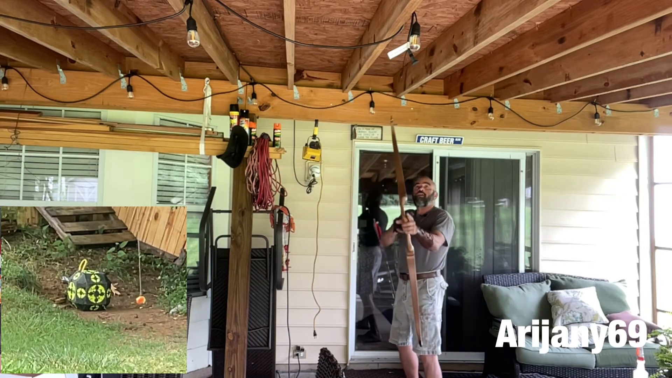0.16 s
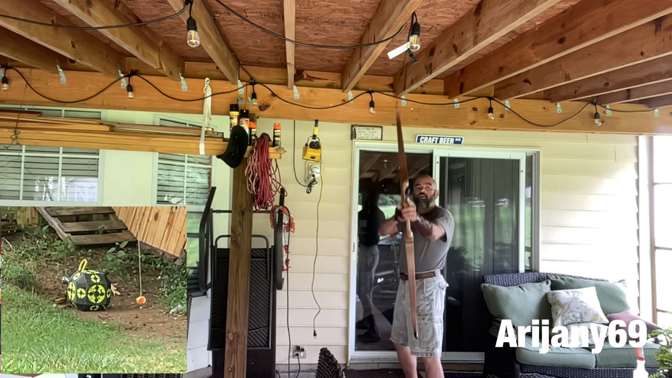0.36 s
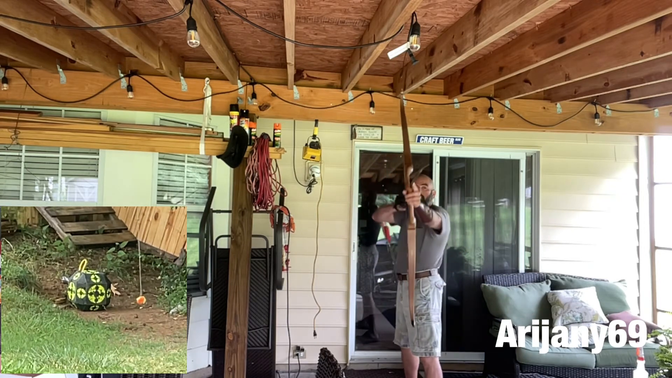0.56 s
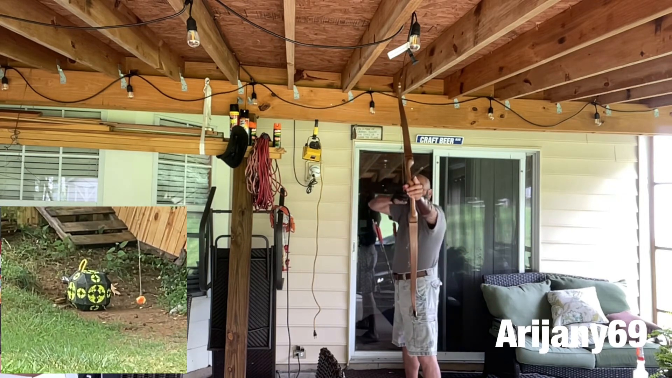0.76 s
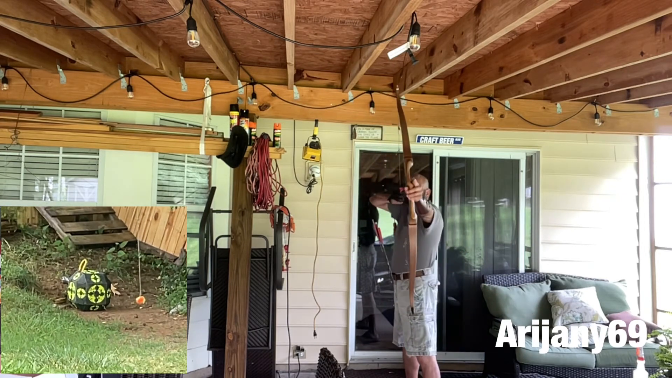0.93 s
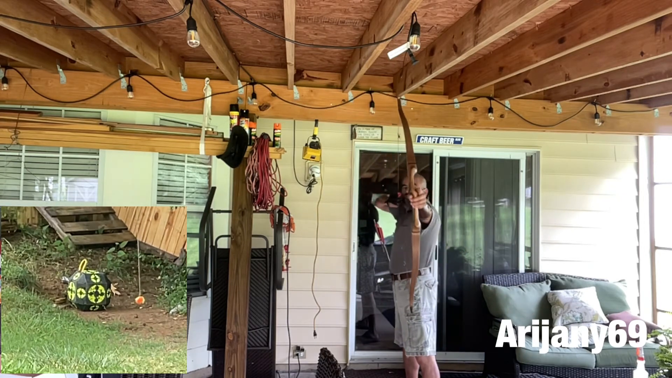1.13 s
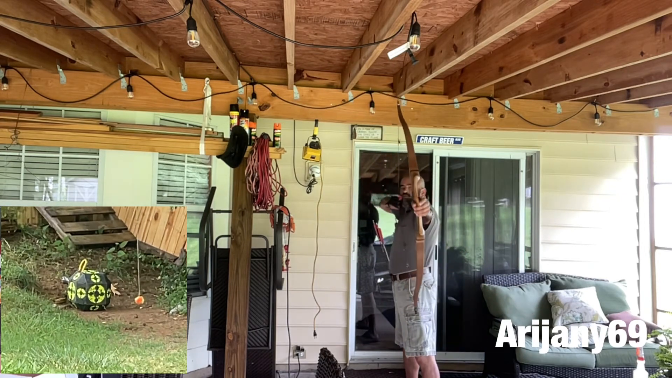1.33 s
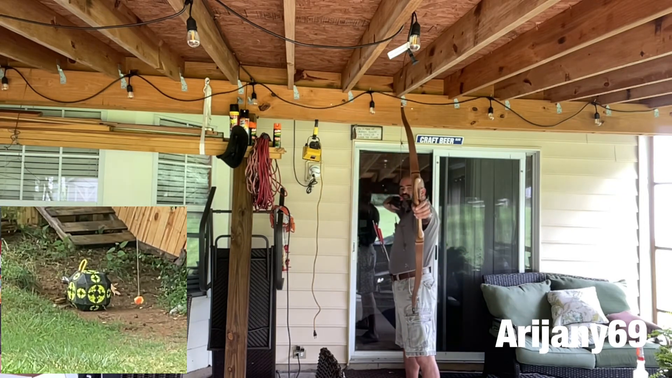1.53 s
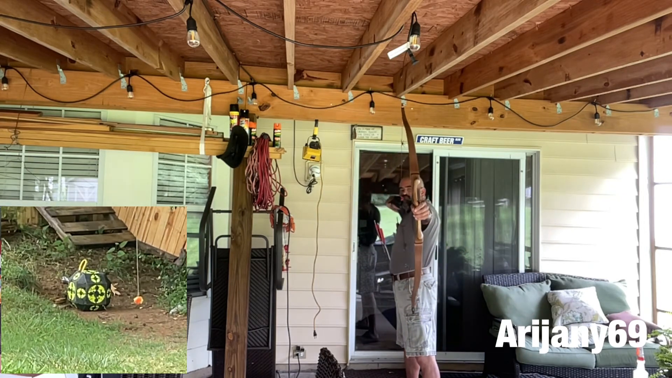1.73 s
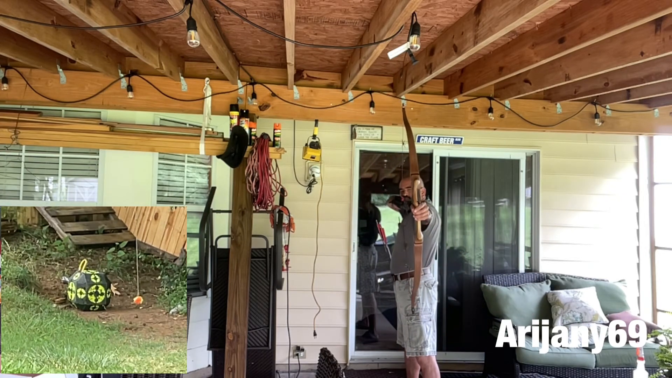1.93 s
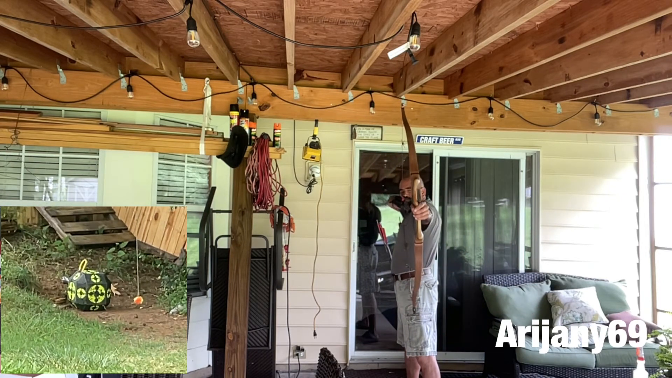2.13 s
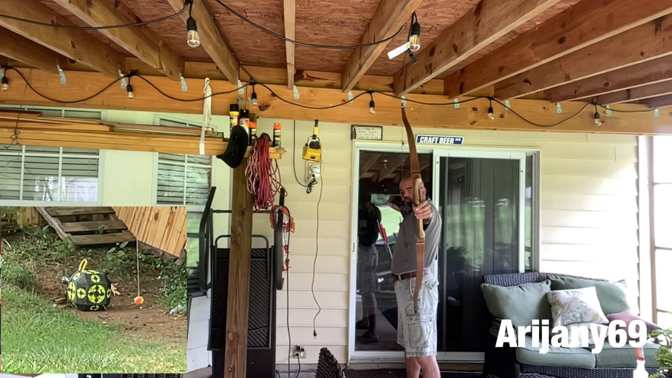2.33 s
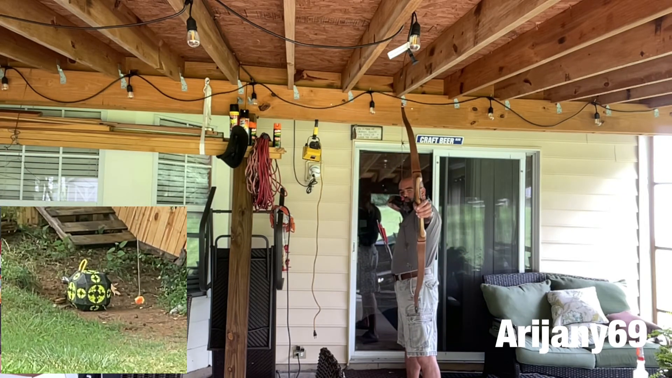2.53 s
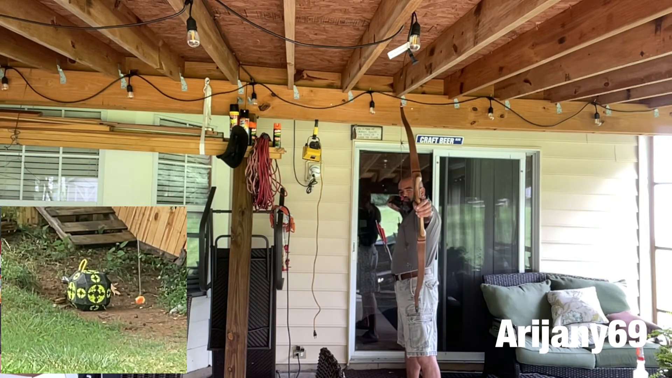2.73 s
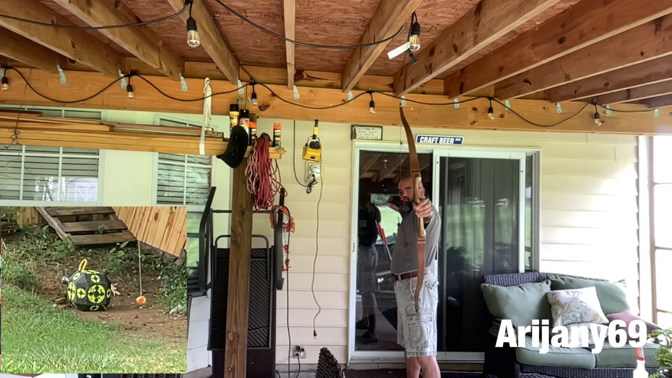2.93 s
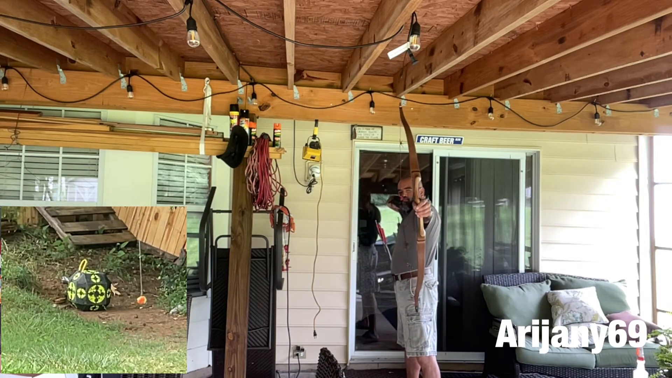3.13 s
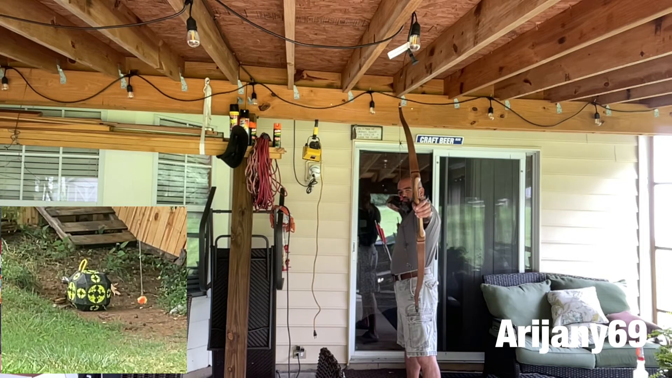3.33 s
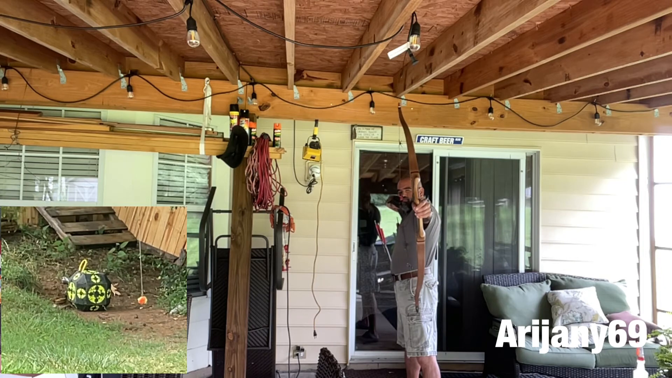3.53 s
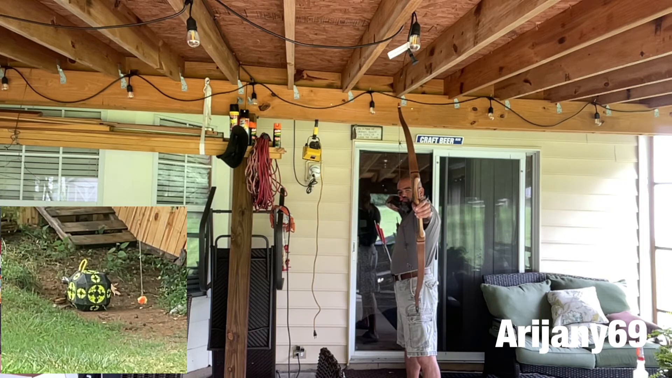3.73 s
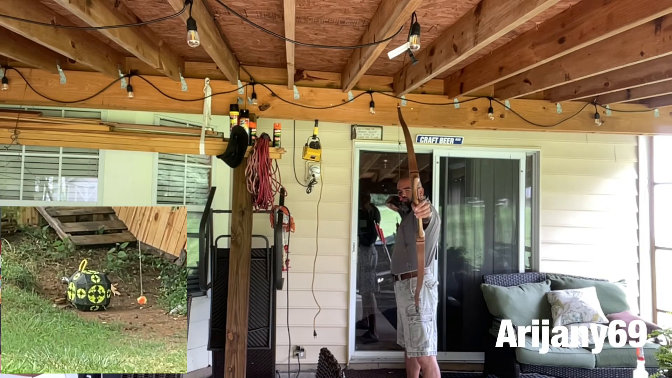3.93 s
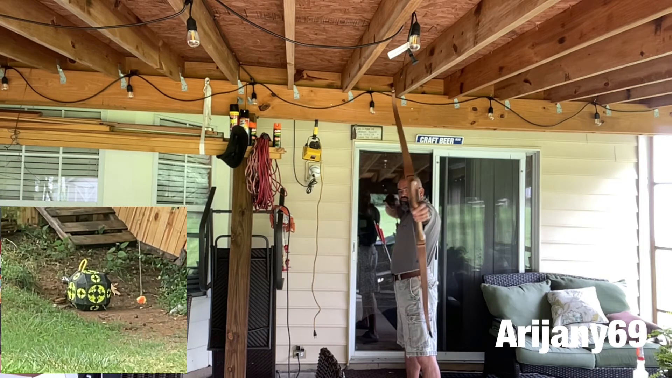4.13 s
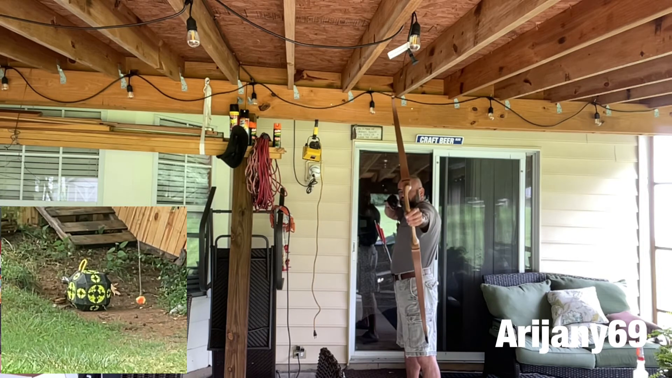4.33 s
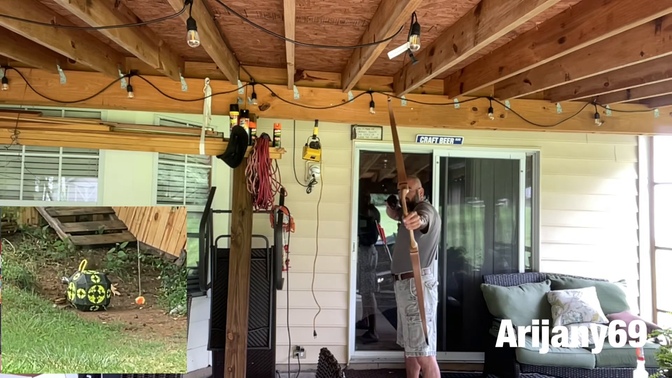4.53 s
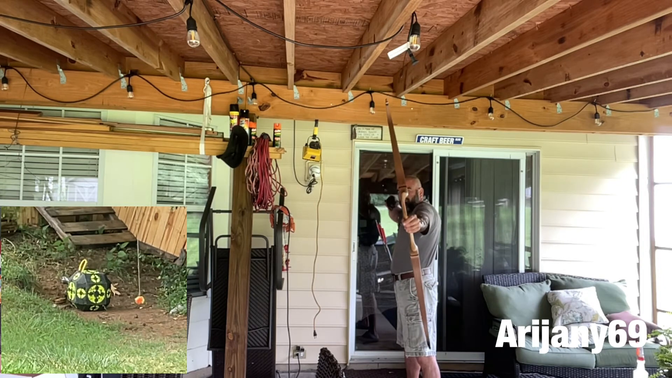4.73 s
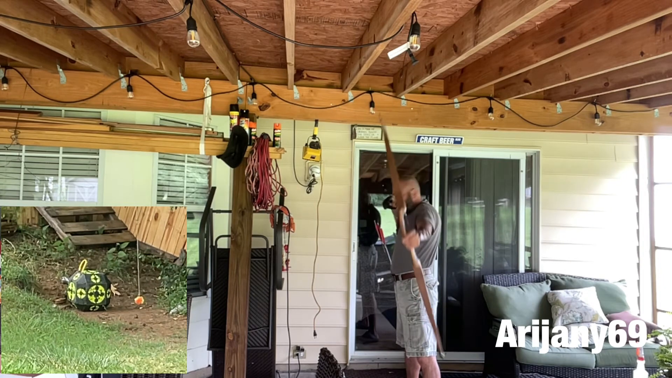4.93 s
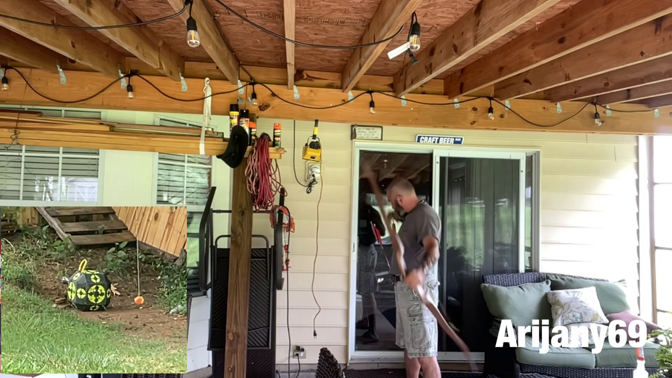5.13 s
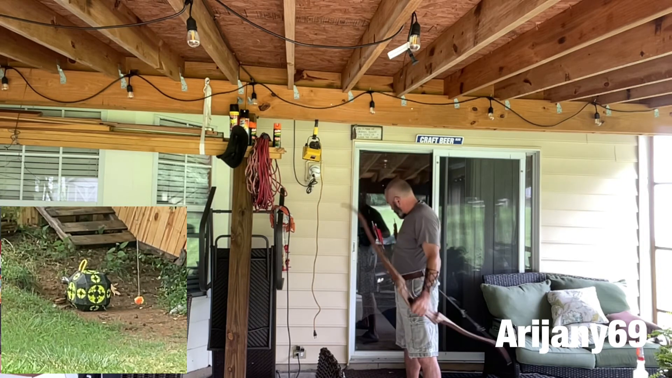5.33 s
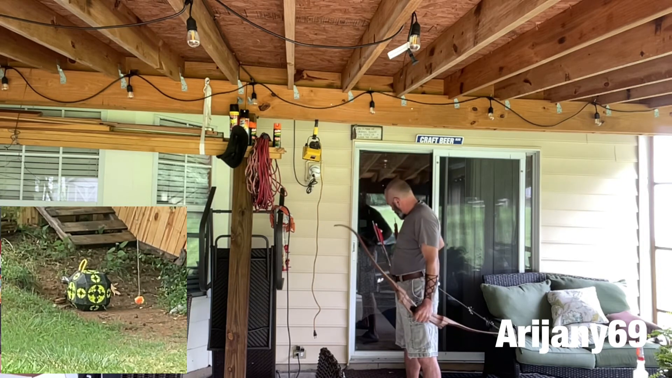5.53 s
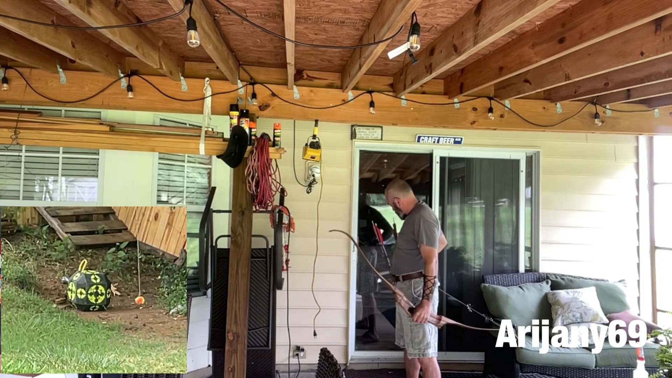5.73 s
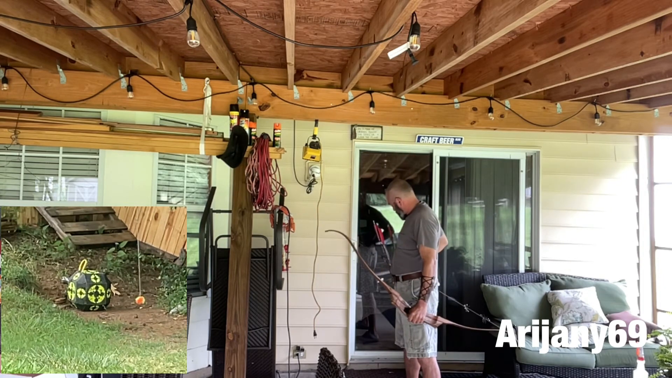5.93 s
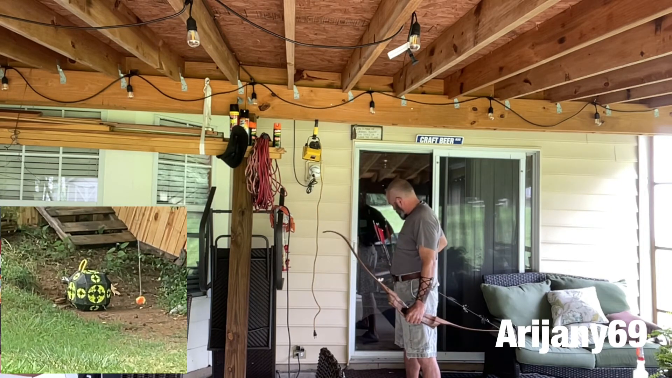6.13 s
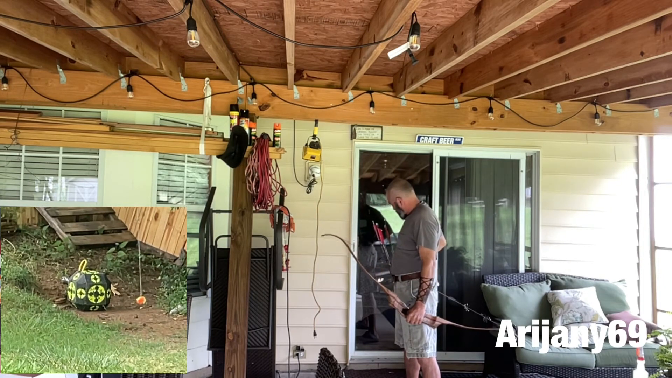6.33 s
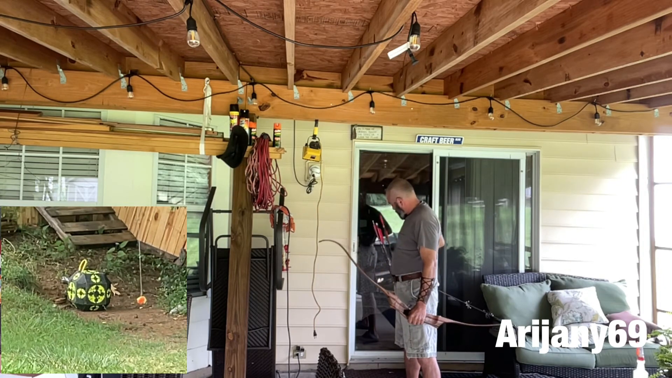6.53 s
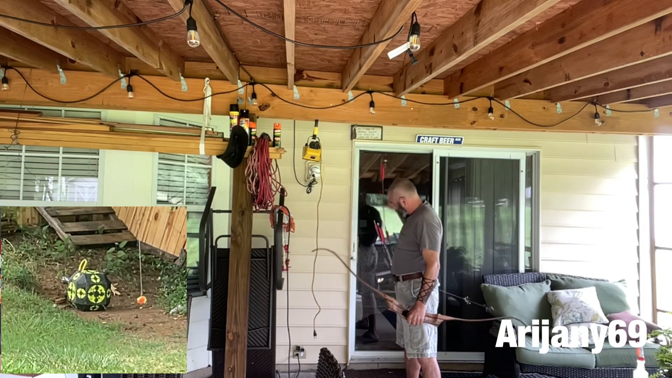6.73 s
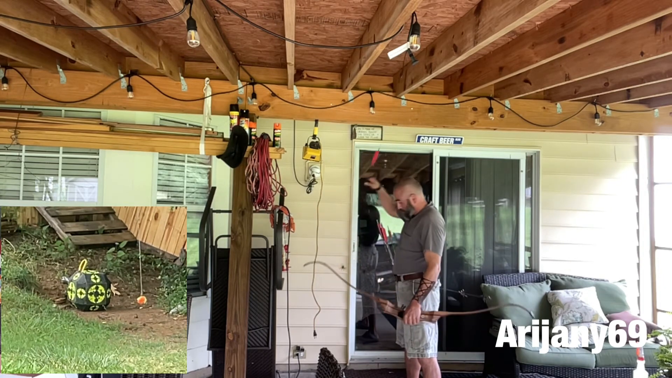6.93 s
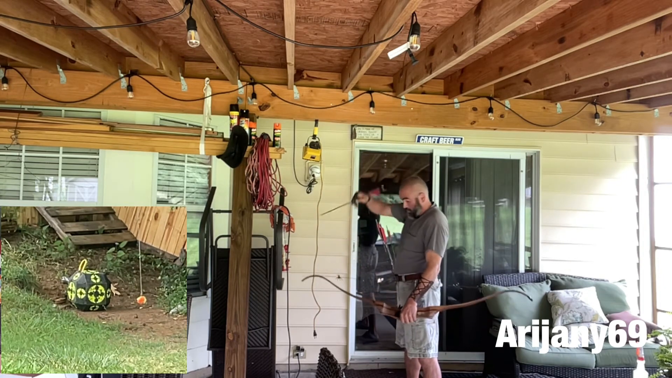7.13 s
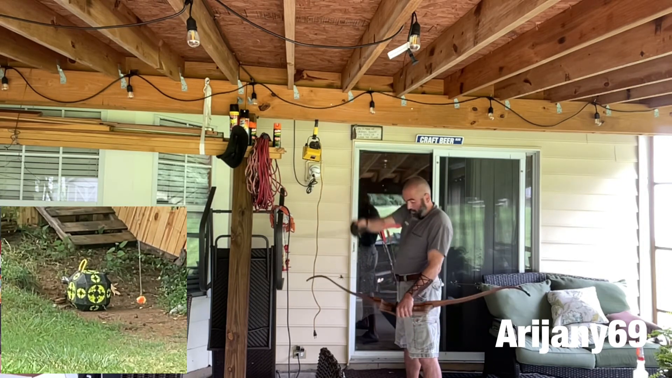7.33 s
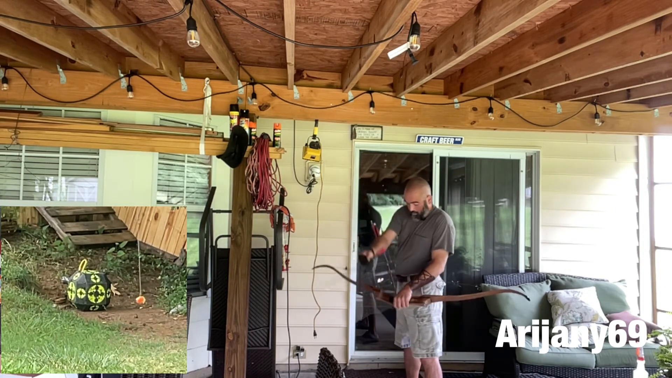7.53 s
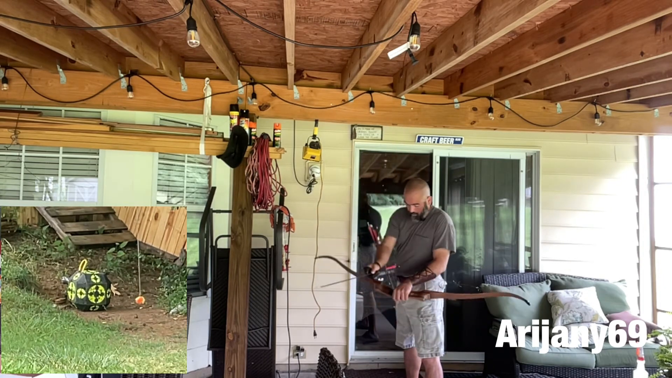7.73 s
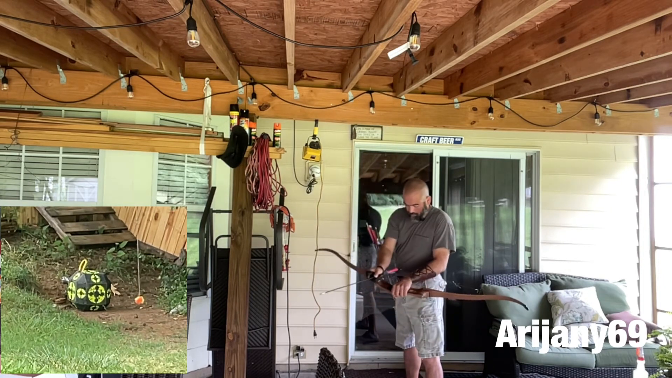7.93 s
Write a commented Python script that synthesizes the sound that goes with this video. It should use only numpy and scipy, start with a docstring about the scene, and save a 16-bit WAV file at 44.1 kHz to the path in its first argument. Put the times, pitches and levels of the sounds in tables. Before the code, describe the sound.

A quiet backyard heard from beneath a wooden porch, in mono. Distant traffic rumbles and gently swells throughout, with soft air, leaf hiss and a thin, shrill pulsing insect chorus. From 0.1 to 2.2 seconds a bird gives eight quick arched whistles, most trailed by a tiny higher flick, while an arrow rubs and ticks faintly until about 0.7. Hazier slurred calls begin near 2.9. At 4.0 the bow is shot, by far the loudest event: a gritty release, scrape and hard woody slap within a few hundredths of a second, then a low hum dying quickly with short porch reflections. A very faint landing follows at 4.5 among repeating birds. Soft knocks come around 5.1, rubbing from 5.5 to 6.4, and a clearer tick at 6.5. Lower bird notes repeat from 7.0, and a hollow, low rush rises to about 7.85, easing by the end at 8.

```python
"""Far traffic, leaf hiss and shrill insects last throughout, made from shaped noise and buzzing tones.
First a bird's arched whistles (gliding pure tones) sound over the rubs and ticks of a bow being drawn; then
more bird calls join in. At about 4 s the bow is shot under a wooden porch roof: gritty noise for the sliding
string and arrow, ringing tones for the shaft, limbs and string, then a faint landing. Afterwards the gear rubs,
knocks and ticks amid more bird calls, and a hollow rush of noise rises briefly near the end."""
import sys
import numpy as np
from scipy import signal
from scipy.fft import rfft, irfft, next_fast_len
from scipy.io import wavfile
from scipy.ndimage import map_coordinates

SR = 44100
rng = np.random.default_rng(int(sys.argv[2]) if len(sys.argv) > 2 else 0)


def materialize(psi):
    """Save the field psi as 16-bit PCM at rate SR to the path in sys.argv[1].

    A 1-D psi becomes a single channel; in a 2-D psi each row is a channel.
    """
    bounded = np.clip(np.atleast_2d(psi).T, -1, 1)
    quanta = np.round(bounded * 32767).astype(np.int16)
    wavfile.write(sys.argv[1], SR, quanta)


N = 355710  # length in samples, about 8 s

# Noise colours, from deep to high, as relative levels: pitch_hz, level_db
# deep rumble of far traffic
RUMBLE_COLOUR = [(15, -54), (25, -56), (48, -6), (102, 1), (122, -1.5), (194, -16), (220, -18.5),
                 (290, -37), (480, -120)]
# the traffic's roar
ROAR_COLOUR = [(120, -10), (200, -4.5), (240, -3.5), (295, 1.5), (340, -5.5), (390, -9.5), (480, -13),
               (650, -51), (1200, -77)]
# soft wash of the open air
WASH_COLOUR = [(250, 0), (480, 1), (650, 2), (900, -2), (1300, -1), (1550, -6.5), (1800, -4.5), (2100, -10),
               (2500, -16.5), (3500, -30), (6000, -62)]
# hiss of leaves
LEAF_COLOUR = [(1000, -6), (2800, 4.5), (4000, 1.5), (4800, 1), (6200, 2), (8000, -5.5), (11800, -8.5),
               (15000, -1)]
# hollow rush
RUSH_COLOUR = [(110, -23), (160, 3.5), (210, 0.5), (330, 0), (390, -2.5), (460, -5.5), (540, -22),
               (700, -13.5), (800, -21.5), (980, -11), (1100, -26), (1400, -62)]
# insect chorus
CHORUS_COLOUR = [(7500, -60), (8900, -23), (9300, -12), (9600, -3), (10200, 0), (10550, -8), (10900, -13.5),
                 (11700, -33)]
# arrow, bow and clothing rubbing
RUB_COLOUR = [(400, -19), (1200, 5), (2500, 0.5), (4000, 1), (7500, 0), (11000, -6), (15000, -2.5)]
# string sliding off the fingers
LOOSE_COLOUR = [(200, -27), (480, -2.5), (1500, 2), (2500, -11), (5000, -10), (8000, -16), (12000, -19),
                (15000, -21)]
# arrow and string against the riser, the bow's handle part
SCRAPE_COLOUR = [(230, -25), (400, -0.5), (650, -2.5), (1000, -15), (1500, -6), (1850, 0.5), (2200, -8),
                 (3000, -6), (4300, -10.5), (5200, -7.5), (7000, -11), (10000, -15), (12000, -17),
                 (15000, -11.5)]
# the arrow landing
LANDING_COLOUR = [(200, -10), (600, 8), (1500, -19), (3200, 5), (7000, -5), (12000, -9), (15500, -14)]

# Loudness of the leaf hiss over time: time_s, level_db
LEAF_LEVELS = [(0, -67.5), (2.8, -72), (4.5, -66.5), (6.6, -69.5), (7.2, -65.5), (8.07, -69)]
# Loudness of the hollow rush over time: time_s, level_db
RUSH_LEVELS = [(7, -73), (7.5, -52.5), (7.68, -48), (7.85, -42.5), (8, -50), (8.07, -52)]
# Swells of the traffic: middle_s, half_width_s, rumble_rise_db, roar_rise_db
TRAFFIC_SWELLS = [(.2, 0.65, 1, 0.5), (2.15, 0.32, 3, 0.5), (3.2, 0.71, 3, 3), (4.45, 0.55, 1.5, 6.5),
                  (5.35, .07, 4.5, -1), (6.3, 0.34, 0, 3), (7.75, 0.48, 1, 3)]
RUMBLE_DB, ROAR_DB, WASH_DB = -45, -53.5, -59.7  # steady levels; the swells shift the first two

# Insects of the chorus: pulses_per_s, pitch_hz, upward_sweep_hz, level_db
BUZZERS = [(5.6, 10230, 427, -68.5), (6.6, 9720, 447, -72), (9.4, 10350, 726, -71), (10, 9600, 930, -75)]
# Bouts of even chirping: first_middle_s, period_s, chirp_count
CHIRP_BOUTS = [(.11, 0.19, 13), (2.99, 0.24, 2), (3.56, .205, 3), (4.35, .223, 6), (5.66, 0.196, 7),
               (7.06, 0.21, 5)]
CHIRP_S, CHIRP_DB = 0.12, -70

# Bird syllables, named for their shape: share_of_length, pitch_hz, level_db (pitch and level are relative)
ARCH = [(0, 2770, -14), (.15, 3050, -5), (.3, 3320, -12.5), (.48, 3270, -7), (.66, 2883, -2.5),
        (.85, 2765, -2), (1, 2770, -4)]
FLICK = [(0, 4350, -2), (.35, 3630, -5.5), (.55, 4400, -5.5), (1, 4020, -12)]
SLUR = [(0, 2883, -7), (.18, 3250, -12), (.4, 2900, -7), (.68, 3250, -3), (.86, 2950, 2), (1, 2590, 4.5)]
SAG = [(0, 5130, 6), (.2, 4880, -2), (.45, 4720, -8), (1, 4650, -4)]
FALL = [(0, 4220, -3), (.3, 3620, -5), (1, 2950, -5)]
DIP = [(0, 8700, -2), (.15, 7400, 2), (.5, 6800, -15), (.8, 6850, -6), (1, 7800, -12)]
DROP = [(0, 2156, -7), (.25, 2282, -9), (.42, 2170, -0.5), (.6, 2030, -3), (.68, 2100, -14), (.8, 2020, -6),
        (1, 1880, -8)]
# The near bird's arched whistles: start_s, level_db
WHISTLES = [(0.083, -55), (.332, -49), (.595, -51), (.882, -53.3), (1.174, -49.5), (1.467, -49.5),
            (1.801, -52.5), (2.11, -53)]
WHISTLE_S, WHISTLE_PITCH_RATIO, WHISTLE_SCATTER = 0.096, 0.98, 0.44
# A softer, higher flick trails each whistle that starts later than FLICK_FROM_S
FLICK_FROM_S, FLICK_AFTER_S, FLICK_S = 0.5, 0.138, 0.042
FLICK_DB, FLICK_SCATTER = -11.5, 0.72  # level compared with its whistle; share scattered
# Far birds repeat one syllable evenly while level and pitch drift: first_s, period_s, syllable_count,
# first_level_db, last_level_db, first_pitch_ratio, last_pitch_ratio, scattered_share, length_s, syllable
PHRASES = [(2.87, 0.2, 4, -62, -57.5, 1.05, 0.98, 0.81, 0.096, SLUR),
           (3.721, .218, 9, -60, -69, .99, 1, 0.85, .085, SLUR),
           (5.711, .198, 4, -62.5, -59.5, .93, .91, 0.7, .095, SLUR),
           (7.035, 0.21, 5, -64, -60, 1, 0.99, .5, 0.15, DROP)]
# Single bird calls, some of them the slurred syllable of the phrases above:
# start_s, length_s, level_db, pitch_ratio, scattered_share, syllable
SINGLE_CALLS = [(3.254, .07, -60, 0.97, .2, DIP), (5.047, .44, -67, 0.97, 0.94, SAG),
                (5.13, .27, -70, .77, 0.9, SAG), (5.252, .1, -62, 0.95, 0.7, SLUR),
                (6.697, .095, -62.5, .86, 0.6, SLUR), (7.041, 0.25, -61.5, 0.99, .97, FALL)]
# House walls across the yard, which return the calls: delay_s, level_db
WALLS = [(.027, -10), (.052, -18)]

# Arrow, bow and clothing rubbing: start_s, level_db, rise_s
RUBS = [(.015, -50, 0.0094), (.29, -55, .06), (.39, -54.5, 0.034), (5.53, -60, .015), (5.621, -62.5, 0.039),
        (5.71, -57.5, 0.017), (5.83, -61.5, .015), (6.372, -62, 0.024)]
RUB_T60_S, RUB_TILT_DB = 0.23, -0.9  # time to fall by 60 dB; tilt per octave
# Small ticks of the arrows: start_s, level_db
TICKS = [(.552, -53.5), (.635, -59), (6.246, -62), (6.539, -45.5), (6.578, -56), (7.53, -60)]
TICK_RISE_S, TICK_T60_S, TICK_TILT_DB = 0.012, 0.067, 2.5
# Light knocks as the bow is lowered: start_s, level_db, pitch_hz
KNOCKS = [(5.085, -55, 1076), (5.185, -56.5, 1580), (5.63, -64, 2110)]

# The arrow shaft and nock as the fingers let go: pitch_hz, level_db, t60_s
SHAFT_TONES = [(470, -15, 0.12), (625, -2, 0.14), (786, 2, .12), (820, -3, 0.14), (1073, -8, 0.26),
               (1154, 3, 0.14), (1220, 0, 0.14), (1283, -8, 0.11), (2516, -12.5, 0.27), (2950, -39, 0.23),
               (3180, -18, 0.24), (3690, -7, 0.11)]
# The bow's limbs and string after the slap: pitch_hz, level_db, t60_s
BOW_TONES = [(80.3, -7.5, 0.32), (157, -11, 0.11), (176, 0.5, .24), (228, -4.5, 0.36), (256, -10, 0.097),
             (263.3, 5.5, 0.22), (310, -8, 0.25), (390, -12, 0.26), (475, -7.5, 0.14), (646, -23, 0.3),
             (788, -8, 0.15), (1070, -29, 0.16), (1190, -19, 0.17), (1320, -25, 0.23), (1355, -14.5, 0.21),
             (1740, -28, 0.33), (1866, -21, 0.29)]

# How long echoes take to fall by 60 dB under the porch: pitch_hz, t60_s
PORCH_ECHO = [(100, 0.51), (500, 0.28), (2000, 0.25), (6000, 0.25), (15000, 0.26)]
# The same among the trees: pitch_hz, t60_s
TREE_ECHO = [(2000, 0.5), (9000, 0.47)]
TOP_HZ = 15800  # upper limit of the microphone


def amp(db):
    """Turn decibels into a multiplier."""
    return 10 ** (np.asarray(db) / 20)


def unit(x):
    """Scale to an average strength (rms) of 1."""
    return x / np.sqrt(np.mean(x ** 2) + 1e-20)


def along(points, hz):
    """Read values between (pitch_hz, value) points, on a log pitch axis."""
    point_hz, value = np.transpose(points)
    return np.interp(np.log(hz + 1), np.log(point_hz + 1), value)


def over_time(points):
    """Read one value per sample between (time_s, value) points."""
    time_s, value = np.transpose(points)
    return np.interp(np.arange(N) / SR, time_s, value)


def wobble(rate, size=N):
    """A smooth random curve through `rate` random points a second."""
    points = rng.standard_normal(int(size * rate / SR) + 4)
    return map_coordinates(points, [np.arange(size) * rate / SR])


def noise(colour, size=N, tilt_db=0):
    """Noise of rms 1 with the given colour, tilted by tilt_db an octave."""
    m = next_fast_len(size)
    hz = np.fft.rfftfreq(m, 1 / SR)
    gain = amp(along(colour, hz) + tilt_db * np.log2(hz + 1))
    return unit(irfft(rfft(rng.standard_normal(m)) * gain, m)[:size])


def add(track, start_s, sound):
    """Mix a sound into the track at start_s, cutting off what runs past the end."""
    part = track[max(round(start_s * SR), 0):][:len(sound)]
    part += sound[:len(part)]


def series(first, period, count):
    """Evenly repeated times."""
    return first + period * np.arange(round(count))


def burst(colour, rise, t60, grain_db, tilt_db=0):
    """Friction noise that builds and dies away, made gritty by tiny slips."""
    t = np.arange(SR // 2) / SR
    shape = np.minimum(t / rise, 1) * amp(-60 * np.maximum(t - rise, 0) / t60)
    rubbing = noise(colour, len(t), tilt_db)
    grit = amp(grain_db * wobble(898, size=len(t)))
    return shape * unit(rubbing * grit)


def ring(tones, attack):
    """Fading tones set going by one blow, as in a struck solid."""
    t = np.arange(SR // 2) / SR
    ringing = sum(amp(db - 60 * t / t60) * np.sin(2 * np.pi * hz * t) for hz, db, t60 in tones)
    return ringing * (1 - np.exp(-t / attack))


def echo(x, decay):
    """A blurred echo of total energy 1, in which each pitch dies at its own speed."""
    hz, t, grid = signal.stft(rng.standard_normal(SR // 2), SR, nperseg=256)
    fade = amp(-60 * t / along(decay, hz)[:, None])
    tail = signal.istft(grid * fade, SR, nperseg=256)[1]
    return signal.fftconvolve(x, tail / np.linalg.norm(tail))[:len(x)]


def outdoors():
    """Far traffic swells and ebbs as low noise, under air wash, leaf hiss and a brief late hollow rush."""
    t = np.arange(N) / SR
    rumble_db, roar_db = RUMBLE_DB, ROAR_DB
    for middle_s, width, rumble_rise_db, roar_rise_db in TRAFFIC_SWELLS:
        bell = np.exp(-((t - middle_s) / width) ** 2)
        rumble_db = rumble_db + rumble_rise_db * bell
        roar_db = roar_db + roar_rise_db * bell
    traffic = amp(rumble_db) * noise(RUMBLE_COLOUR) + amp(roar_db) * noise(ROAR_COLOUR)
    wash = amp(WASH_DB) * noise(WASH_COLOUR)
    leaves = amp(over_time(LEAF_LEVELS)) * noise(LEAF_COLOUR)
    rush = amp(over_time(RUSH_LEVELS)) * noise(RUSH_COLOUR)
    return traffic + wash + leaves + rush


def insects():
    """A shrill noise chorus with pulsing, upward-sweeping voices, and a lower voice of even noise chirps."""
    t = np.arange(N) / SR
    chorus = amp(-64.5 + 1.0 * wobble(25)) * noise(CHORUS_COLOUR)
    for rate, hz, sweep_hz, db in BUZZERS:
        beat = (rate * t + 0.1873 * wobble(3) + rng.random()) % 1  # place within each pulse, 0 to 1
        rasp = noise([(90, -8.5), (220, -7.0), (600, -40.5)])  # uneven wing strokes widen the tone
        tone = np.sin(2 * np.pi * np.cumsum(hz + sweep_hz * (beat - 0.5)) / SR)
        chorus += amp(db) * unit(np.sin(np.pi * beat) ** 2 * rasp * tone)
    gate = np.zeros(N)  # opens for each chirp
    for first, period, count in CHIRP_BOUTS:
        for middle_s in series(first, period, count):
            add(gate, middle_s - CHIRP_S / 2, np.hanning(int(CHIRP_S * SR)))
    chirp_noise = noise([(8300, -40), (8640, -14), (8800, -5), (8950, -12), (9300, -35)])
    return chorus + amp(CHIRP_DB) * gate * chirp_noise


def songs():
    """List each bird call: start_s, length_s, level_db, pitch_ratio, scattered_share, syllable."""
    calls = list(SINGLE_CALLS)
    for s, db in WHISTLES:
        calls.append((s, WHISTLE_S, db, WHISTLE_PITCH_RATIO, WHISTLE_SCATTER, ARCH))
        if s > FLICK_FROM_S:
            calls.append((s + FLICK_AFTER_S, FLICK_S, db + FLICK_DB, 1, FLICK_SCATTER, FLICK))
    for first, period, count, first_db, last_db, first_ratio, last_ratio, far, length, syllable in PHRASES:
        times = series(first, period, count)
        drift = np.linspace((first_db, first_ratio), (last_db, last_ratio), len(times))
        calls += [(s, length, db, ratio, far, syllable) for s, (db, ratio) in zip(times, drift)]
    return calls


def birds():
    """Pure gliding whistles, smeared by their way through the trees and returned by walls."""
    direct, scattered = np.zeros(N), np.zeros(N)
    for s, length, db, ratio, far, syllable in songs():
        u = np.linspace(0, 1, int(length * SR))
        share, hz, level = np.transpose(syllable)
        far = np.clip(far, 0, 1)
        blur = 0.0026 + 0.027 * far ** 3  # near calls stay pure, distant ones sound hazy
        pitch = ratio * np.interp(u, share, hz) * (1 + blur * wobble(502, size=len(u)))
        loudness = amp(db + np.interp(u, share, level)) * signal.windows.tukey(len(u), 0.15)
        call = loudness * np.sin(2 * np.pi * np.cumsum(pitch) / SR)
        direct_call = np.sqrt(1 - far) * call
        add(direct, s, direct_call)
        add(scattered, s, np.sqrt(far) * call)
        for delay, wall_db in WALLS:
            add(direct, s + delay, amp(wall_db) * direct_call)
    through_trees = amp(-1.0) * echo(scattered, TREE_ECHO)
    under_porch = amp(-7.0) * echo(scattered, PORCH_ECHO)
    return amp(0.3) * direct + through_trees + under_porch


def handling():
    """The arrow slides on its rest during the draw; later the gear rubs, ticks and knocks, all as friction."""
    gear = np.zeros(N)
    for s, db, rise in RUBS:
        add(gear, s, amp(db) * burst(RUB_COLOUR, rise, RUB_T60_S, grain_db=4.5, tilt_db=RUB_TILT_DB))
    for s, db in TICKS:
        tick = burst(RUB_COLOUR, TICK_RISE_S, TICK_T60_S, grain_db=6.0, tilt_db=TICK_TILT_DB)
        add(gear, s, amp(db) * tick)
    for s, db, hz in KNOCKS:
        colour = [(hz / 1.16, -28), (hz, 0), (hz * 1.25, -28), (hz * 2, -60)]  # narrow, so it has a pitch
        add(gear, s, amp(db) * burst(colour, rise=0.006, t60=0.11, grain_db=4))
    return amp(-1.0) * gear + amp(-3.5) * echo(gear, PORCH_ECHO)


def shot():
    """Friction bursts and ringing solids: release, arrow past the riser, string slap and hum, landing."""
    friction, tones = np.zeros(N), np.zeros(N)
    # the string slides off the fingers and the arrow rings
    add(friction, 3.997, amp(-23.0) * burst(LOOSE_COLOUR, rise=0.004, t60=0.068, grain_db=1.5))
    add(tones, 3.9994, amp(-27.5) * ring(SHAFT_TONES, attack=0.0011))
    # the arrow scrapes past the riser
    add(friction, 4.008, amp(-23.5) * burst(SCRAPE_COLOUR, rise=0.0049, t60=0.091, grain_db=1.5))
    # the string slaps taut and the bow hums
    add(friction, 4.0192, amp(-23.0) * burst(SCRAPE_COLOUR, rise=0.00062, t60=0.066, grain_db=5.5))
    add(tones, 4.0192, amp(-18.5) * ring(BOW_TONES, attack=0.0014))
    # the string swings back and buzzes against the limb tips
    add(friction, 4.044, amp(-30.5) * burst(SCRAPE_COLOUR, rise=0.012, t60=0.035, grain_db=3.0))
    # the arrow lands across the yard
    add(friction, 4.457, amp(-57.5) * burst(LANDING_COLOUR, rise=0.028, t60=0.11, grain_db=6))
    # the porch roof and the wall behind answer
    friction_mix = amp(0.5) * friction + amp(1.0) * echo(friction, PORCH_ECHO)
    return friction_mix + tones + amp(-11.5) * echo(tones, PORCH_ECHO)


def scene():
    """Add all the sources together into one channel."""
    return (shot() + handling() + birds() + insects() + outdoors())[None]


def record(dry):
    """The microphone weakens the deepest bass and keeps nothing from TOP_HZ upward."""
    dry = signal.sosfilt(signal.butter(3, 48, "highpass", fs=SR, output="sos"), dry)
    m = next_fast_len(N + SR // 2)
    kept = np.fft.rfftfreq(m, 1 / SR) < TOP_HZ
    return irfft(rfft(dry, m) * kept, m)[..., :N]


dry = scene()
out = record(dry)
materialize(out)
```